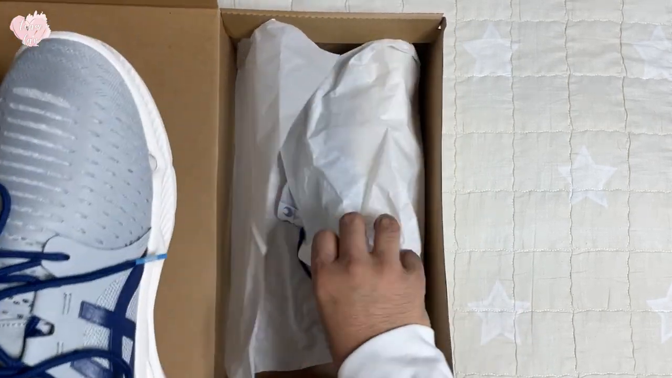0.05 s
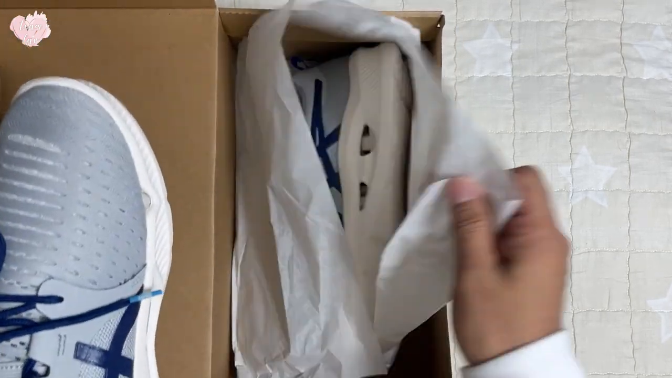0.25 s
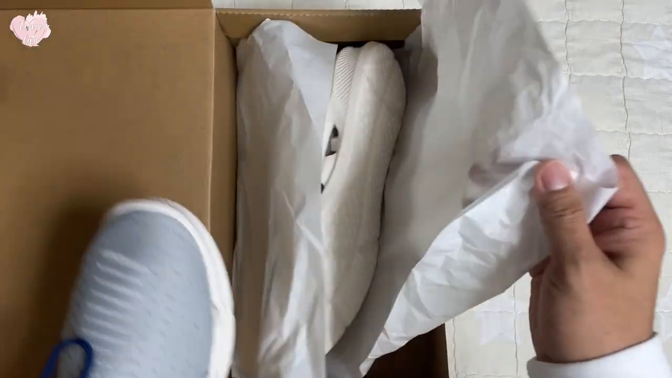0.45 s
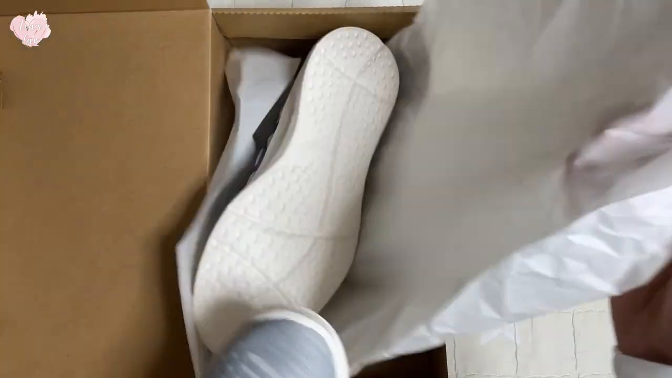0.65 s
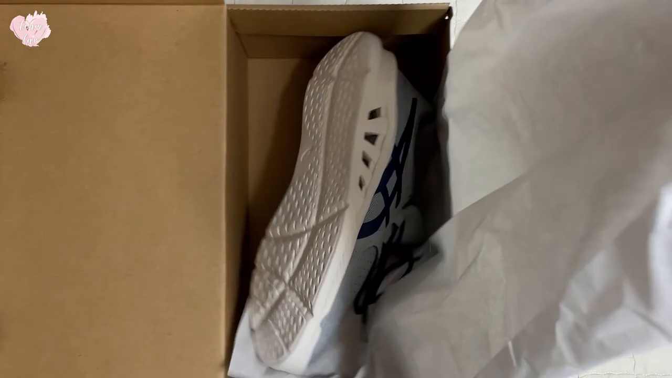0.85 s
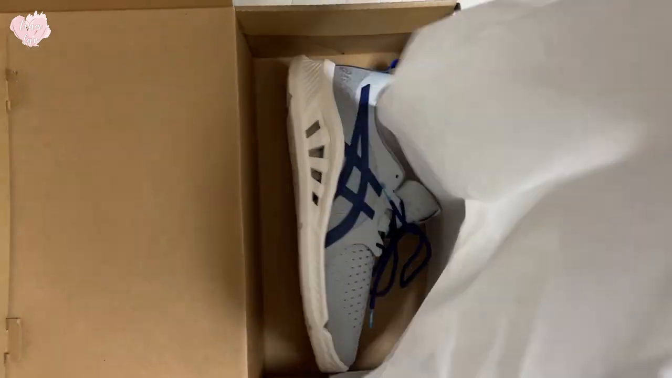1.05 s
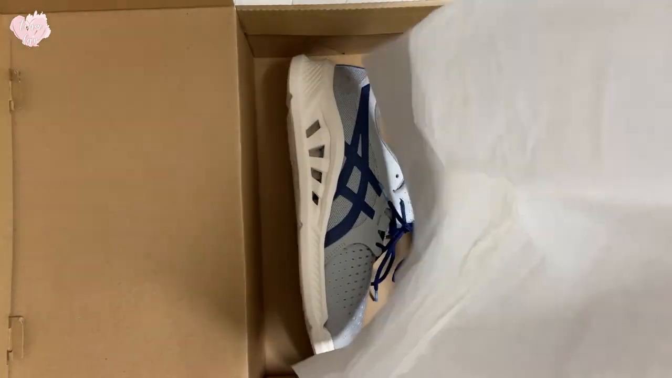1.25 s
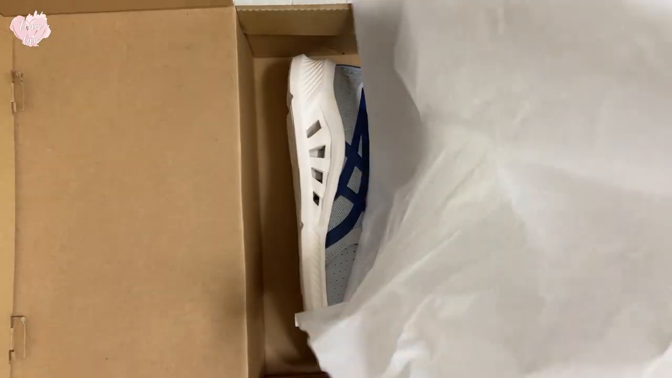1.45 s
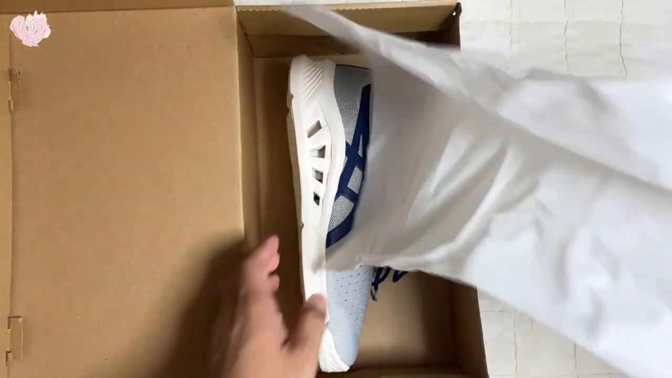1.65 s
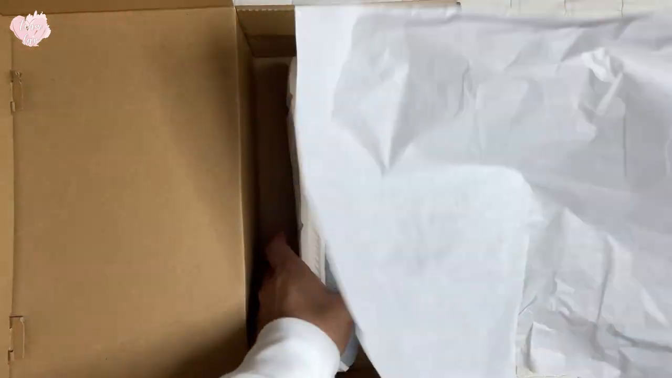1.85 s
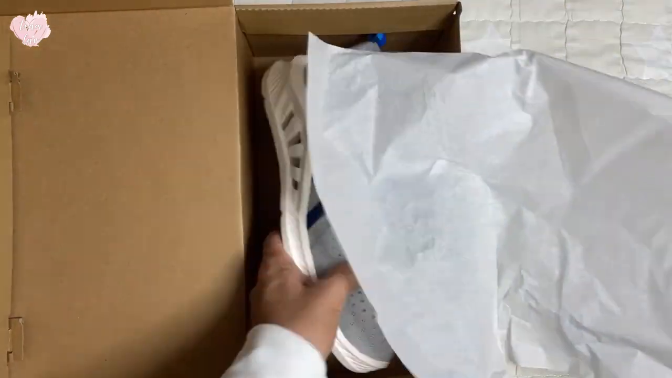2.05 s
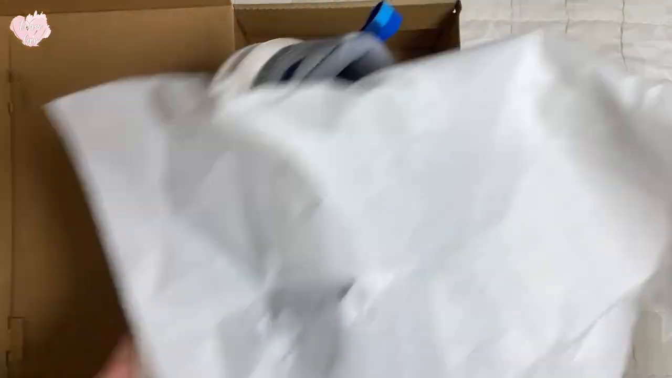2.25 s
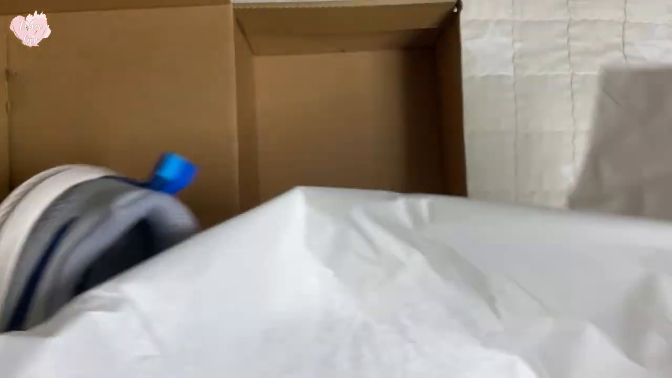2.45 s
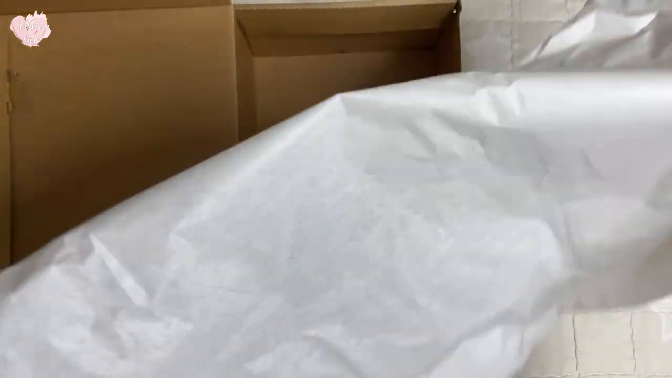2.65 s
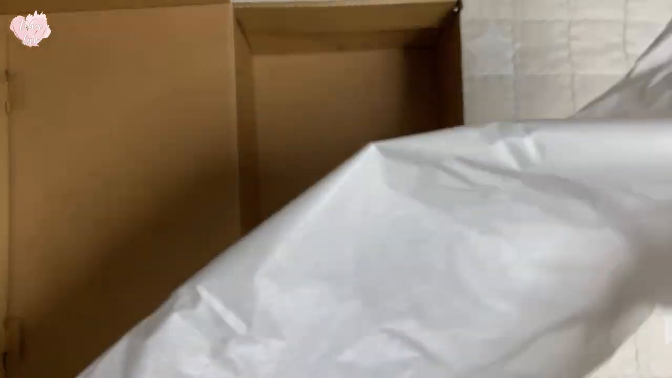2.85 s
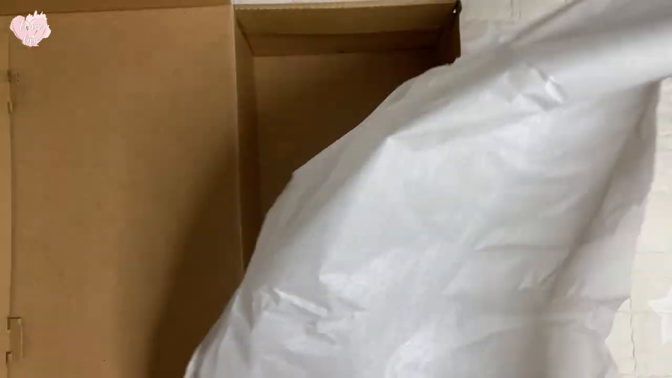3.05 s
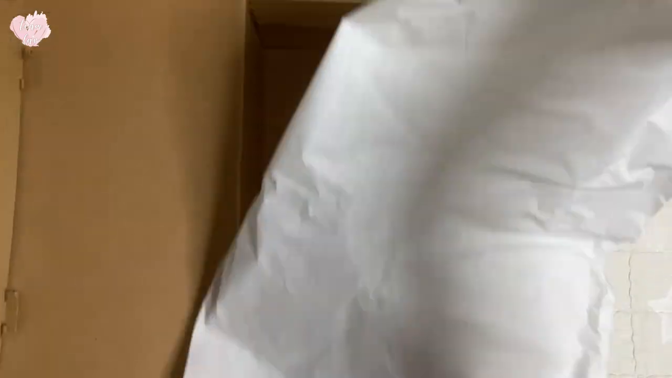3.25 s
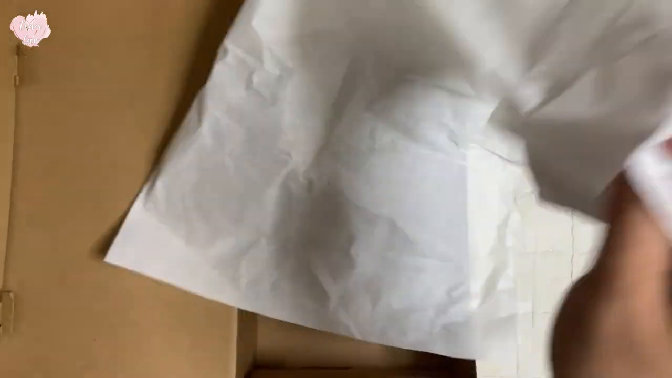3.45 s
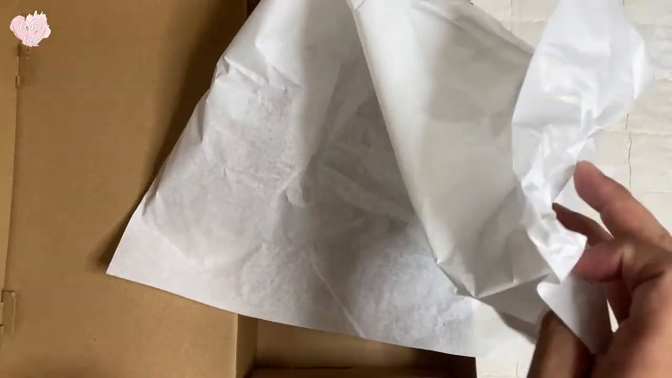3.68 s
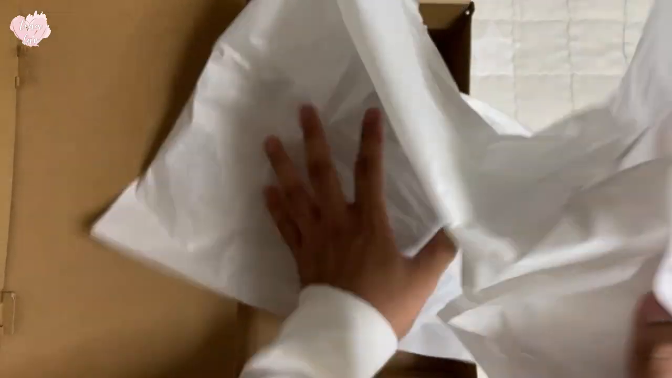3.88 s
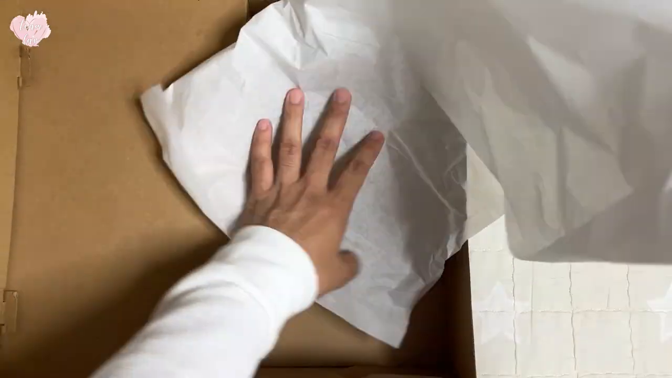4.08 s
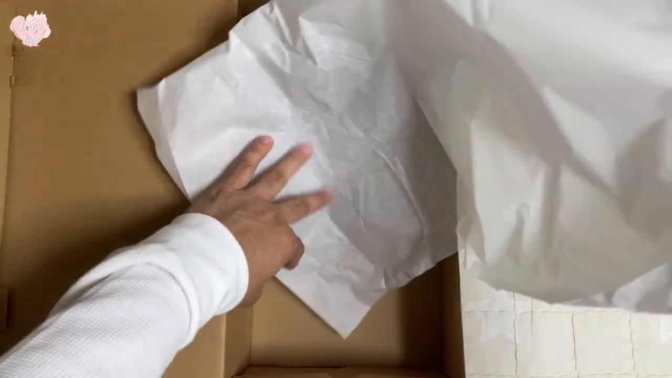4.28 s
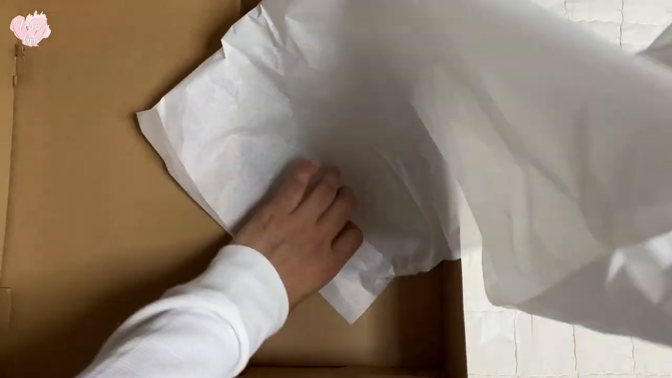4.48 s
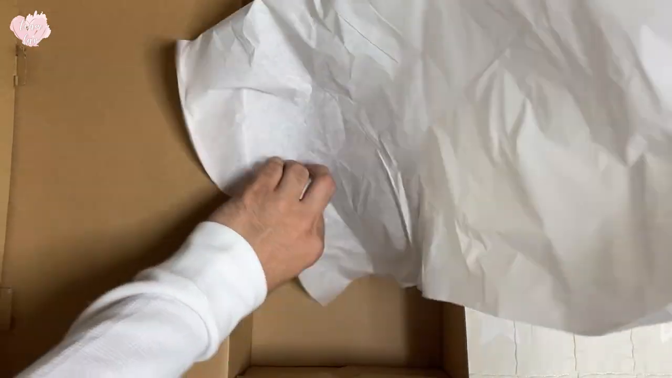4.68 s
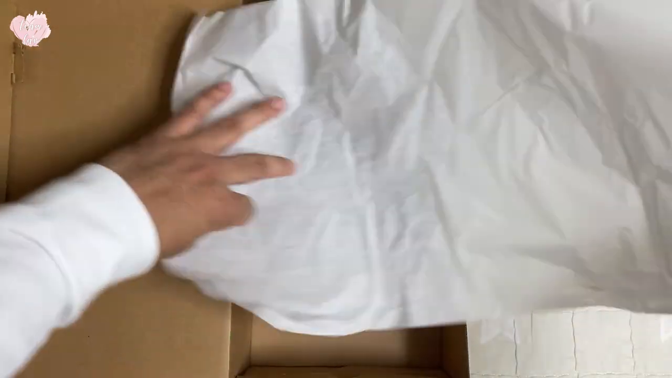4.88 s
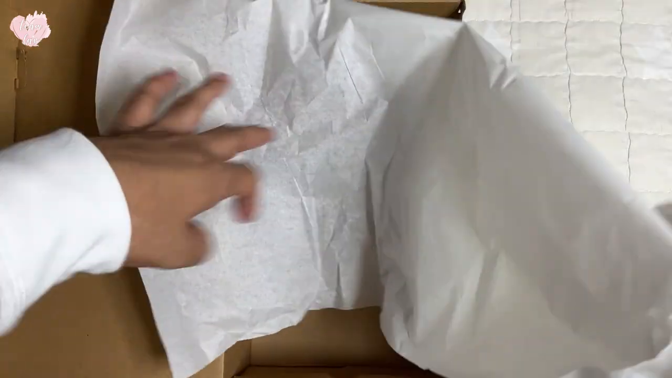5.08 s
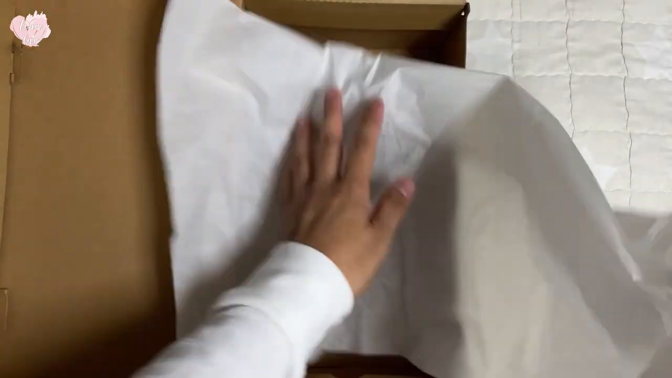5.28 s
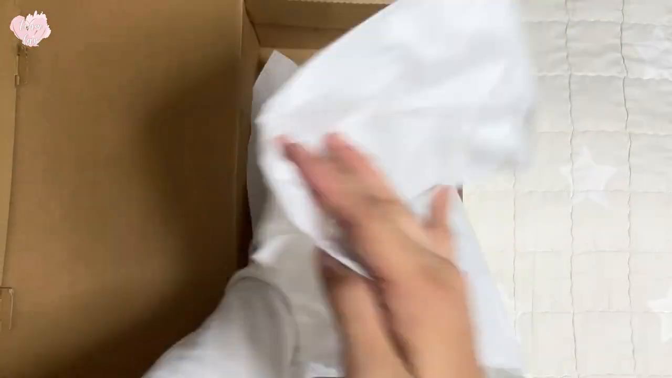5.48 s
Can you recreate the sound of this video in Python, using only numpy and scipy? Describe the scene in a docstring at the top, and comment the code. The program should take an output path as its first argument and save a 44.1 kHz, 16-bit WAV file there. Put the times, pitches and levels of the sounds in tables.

```python
"""Tissue paper crackles and rustles as hands pull it from a shoe and unfold it in a cardboard shoebox, close by.
Tiny creases buckle in clumps under each pull, larger ones snap singly: bursts of noise that die within milliseconds.
Panels of the sheet pop as falling chirps, and the sheet fans low puffs of noise.
Shoe and hands bump the box as damped low tones; its walls scatter the paper sound, and a quiet room hums faintly."""
import sys
import numpy as np
from scipy import signal
from scipy.fft import rfft, irfft, next_fast_len
from scipy.io import wavfile
from scipy.ndimage import uniform_filter1d

SR = 44100
rng = np.random.default_rng(int(sys.argv[2]) if len(sys.argv) > 2 else 0)


def bounce(signal):
    """Save signal as a 16-bit WAV file at the path given by the first command-line argument."""
    frames = np.transpose(np.atleast_2d(signal))
    limited = np.clip(frames, -1, 1)
    pcm = np.round(limited * 32767).astype(np.int16)
    wavfile.write(sys.argv[1], SR, pcm)


N = 243627
TIME = np.arange(N) / SR
SIZE = next_fast_len(N + 8192)  # transform length, padded
FREQ = np.maximum(np.arange(SIZE // 2 + 1) * SR / SIZE, 1)


def from_db(db):
    """Decibels to gain."""
    return 10 ** (np.asarray(db) / 20)


def rms_one(x):
    """Scale to rms 1."""
    return x / np.sqrt(np.mean(x ** 2) + 1e-20)


def gains(points):
    """Turn rows of Hz and dB into a gain at every frequency, joined along log frequency."""
    hz, db = np.transpose(points)
    return from_db(np.interp(np.log(FREQ), np.log(hz), db))


def filtered(x, response):
    """Apply a frequency response."""
    return irfft(rfft(x, SIZE) * response, SIZE)[..., :N]


def below(hz):
    """The low half of a crossover; the high half is one minus this."""
    return 1 / (1 + (FREQ / hz) ** 4)


def drift(rate):
    """Smooth random wander of rms 1, heading for a new value rate times a second."""
    knots = rng.standard_normal(4096)
    return rms_one(np.interp(TIME * rate, np.arange(len(knots)), knots))


def dying(energy, decay_s):
    """Spread each packet of energy over an exponential decay."""
    r = np.exp(-1 / (decay_s * SR))
    return signal.lfilter([1 - r], [1, -r], energy + 1e-20)


def swell_and_fade(age):
    """A pulse that rises to 1 at age 1, then dies away."""
    return age * np.exp(1 - age)


def pulling():
    """Each pull swells, holds and dies away, a little jerkily; returns rustle level and low-mid body in dB."""
    # Pulls and presses of the hands on the sheet. Each row: time of reaching full strength in seconds,
    # rustle in dB before the mix trim, attack in seconds, hold in seconds,
    # low-mid body of slack panels in dB before its trim.
    pulls = [(0.026, -27.5, 0.18, 0.037, -1), (0.178, -25, 0.05, 0.031, -2),
             (0.31, -30.5, 0.031, 0.038, -3), (0.387, -33, 0.0027, 0.09, -2),
             (0.507, -30, .002, 0.0092, 3.5), (0.576, -32, 0.017, 0.017, 3),
             (0.654, -24.5, 0.027, 0.045, 0), (0.786, -24, 0.077, 0.14, -1),
             (1.036, -25.5, 0.08, 0.018, -1.5), (1.169, -38, 0.025, 0.031, -4),
             (1.391, -41.5, 0.012, 0.1, -3.5), (1.605, -33.5, 0.06, 0.0033, -2.5),
             (1.66, -40, 0.03, 0.032, -8), (1.715, -35, 0.003, 0.007, -12),
             (1.793, -32.5, 0.0098, 0.0092, -4), (1.881, -40.5, 0.045, 0.025, -1),
             (2.098, -26.5, 0.0024, 0.03, 1), (2.211, -30.5, 0.028, 0.034, -2.5),
             (2.374, -40.5, 0.02, 0.01, 1.5), (2.442, -40, 0.011, 0.07, 1.5),
             (2.555, -37, 0.002, 0.085, -0.5), (2.71, -45, 0.003, 0.0044, 5.5),
             (2.823, -41, 0.0075, 0.15, 1), (3.066, -45, 0.079, 0.016, -18),
             (3.183, -37.5, 0.012, 0.054, 2.5), (3.348, -40.5, 0.041, 0.049, 0.5),
             (3.498, -32, 0.019, 0.049, 2), (3.66, -40.5, 0.018, 0.016, -4), (3.855, -33, 0.006, 0.09, 0),
             (3.992, -27, 0.0035, 0.037, 3.5), (4.157, -26, 0.0045, 0.019, 1.5),
             (4.246, -25, 0.13, 0.012, -1.5), (4.321, -29.5, .01, 0.028, -2.5),
             (4.42, -37.5, 0.016, 0.0046, 2.5), (4.668, -30.5, 0.055, .002, -2),
             (4.724, -27.5, 0.0081, 0.025, 1), (4.888, -39.5, 0.002, 0.025, 0),
             (4.944, -27, 0.033, .002, 1.5), (4.993, -29, 0.012, 0.022, -1.5),
             (5.148, -43, 0.022, 0.0033, 0), (5.232, -43, 0.012, 0.063, -6),
             (5.321, -29.2, 0.003, 0.078, 0.5), (5.439, -25.8, 0.003, 0.043, -2.5)]
    release_s = 0.045  # the sheet settles after each pull
    rest_db, rest_body_db = -52, 4  # the sheet never lies quite still
    jerk_db, jerks_per_s = 1.0, 40  # the paper gives way unevenly
    energy = np.full(N, from_db(rest_db) ** 2)
    slack = energy * from_db(rest_body_db) ** 2
    for s, db, attack, hold, body_db in pulls:
        before = np.maximum(s - TIME, 0) / attack
        after = np.maximum(TIME - s - hold, 0) / release_s
        pull = from_db(db) ** 2 * np.exp(-2 * np.minimum(before + after, 20))
        energy = energy + pull
        slack = slack + pull * from_db(body_db) ** 2
    level = 10 * np.log10(energy) + jerk_db * np.tanh(drift(jerks_per_s))
    return level, 10 * np.log10(slack / energy)


def buckles(level, per_s, growth, size_db, clump_db):
    """Energy of tiny creases giving way in clumps, more of them under a harder pull; evened to a mean near 1."""
    born = rng.random(N) < per_s * from_db(growth * (level - np.mean(level))) / SR
    clumps = np.tanh(drift(170))
    sizes = np.minimum(rng.exponential(1, N), 2.6)
    energy = born * from_db(size_db * sizes + clump_db * clumps) ** 2
    local_mean = uniform_filter1d(uniform_filter1d(energy, size=1000), size=700)
    return energy / (local_mean + 0.00082)


def stray_snaps(level, count=200):
    """Lesser creases snap at random moments, louder under a harder pull, so that the pauses stay quiet."""
    per_s, follows = 24, 1.0  # mean rate; share of the pull's swing
    mean_db, spread_db, tilt_db, decay_s = -40, 2.3, 7.5, .0004
    when, chance = rng.random((count, 2)).T
    strength, tilt = np.clip(rng.standard_normal((count, 2)), -2, 2).T
    at = (when * (N - 1)).astype(int)
    db = mean_db + follows * (level[at] - np.mean(level)) + spread_db * strength
    rows = np.column_stack([at / SR, db, tilt_db * tilt, np.full(count, decay_s)])
    return rows[chance < per_s * N / SR / count]


def snaps(rows, treble, longer, own_db, size=1500):
    """Energy of snapping creases in one band: bright dry ticks or longer tears, each with its own colour."""
    out, t = np.zeros(N + size), np.arange(size) / SR
    colours = own_db * rng.uniform(-1.2, 1, size)
    for (s, db, tilt, decay), colour in zip(rows, colours):
        at = max(round(s * SR), 0)
        fall = np.exp(-t / (decay * longer))
        gain = from_db(db + tilt * (treble - 0.38) + colour)
        out[at:at + size] += gain ** 2 * fall / np.sum(fall)
    return out[:N]


def crinkle(level, body, rustle_db, body_db, bright_db, snap_db, snap_bass_db, rub, bass_rub, own_db,
            ring_s, ring_slope, snap_slope, box_s, box_db, snap_box_db):
    """Creases set countless close modes ringing, as noise with brief decays; returns common and differing sound."""
    # Large creases snapping. Each row: start in seconds, level in dB before the mix trim,
    # treble tilt in dB, energy decay in seconds at 5 kHz.
    large_creases = [(0.0173, -31, 0, 0.0004), (0.1173, -24, -1, 0.0014), (0.2043, -19, 7, 0.0023),
                     (0.2926, -29, 9, 0.0015), (0.3176, -27, 6, 0.0012), (0.3481, -30, 1, 0.00058),
                     (0.3891, -25, -3, 0.0012), (0.4051, -24, 7, 0.0018), (0.5094, -32, 2, 0.0006),
                     (0.5665, -28, -12, 0.0014), (0.5831, -28, 3, 0.00076), (0.595, -27, 2, 0.0008),
                     (0.6958, -19.5, 6, 0.0008), (0.8769, -23, -8, 0.0018), (0.912, -20, -7, 0.001),
                     (0.982, -24.5, 8, 0.0014), (1.0402, -20.5, 15, 0.0035), (1.1319, -34.5, -6, 0.0013),
                     (1.222, -30, 1, 0.0004), (1.2253, -33.5, -5, 0.0005), (1.3525, -37, -9, 0.0002),
                     (1.3685, -44, -8, 0.0006), (1.4434, -40, 12, 0.0004), (1.4547, -41, 12, 0.0005),
                     (1.5392, -37, 18, 0.0008), (1.602, -33, -1, 0.0009), (1.6105, -33, 6, 0.0015),
                     (1.709, -28.5, 7, 0.0015), (1.7245, -37, 8, 0.0011), (1.9209, -29, -1, 0.00081),
                     (1.957, -36, -9, 0.0015), (1.9893, -35.5, -8, 0.0013), (2.093, -18.5, 2, 0.00091),
                     (2.115, -25, 3, 0.00096), (2.2095, -21, 10, 0.00082), (2.224, -23.5, -3, 0.0012),
                     (2.2387, -21, -4, 0.002), (2.2667, -25.5, 12, 0.001), (2.2715, -23.5, 4, 0.0011),
                     (2.3025, -32.5, 2, 0.0005), (2.3787, -32.5, 1, 0.00092), (2.4611, -33, 5, 0.00047),
                     (2.554, -31, -6, 0.0015), (2.5687, -36, -6, 0.00018), (2.5823, -29, 8, 0.00083),
                     (2.615, -27, 6, 0.0018), (2.6237, -28, 7, 0.00024), (2.6719, -33.5, 9, 0.00044),
                     (2.7186, -34.5, 0, 0.00077), (2.7321, -30, 4, 0.0025), (2.7646, -42, 12, 0.0005),
                     (2.808, -51, 0, 0.0006), (2.8582, -36.5, 2, 0.00025), (2.8958, -29.5, -4, 0.0018),
                     (2.9546, -27.5, 4, 0.0006), (3.0268, -36.5, -3, 0.0012), (3.083, -37, -8, 0.0007),
                     (3.0994, -37, -8, 0.00056), (3.1411, -35.5, 8, 0.00027), (3.1578, -30, 4, 0.00024),
                     (3.173, -43, 8, 0.0007), (3.2061, -29, 13.5, 0.00028), (3.2128, -26, 6, 0.00038),
                     (3.2325, -31, 0, 0.001), (3.2888, -32.5, 13, 0.00017), (3.3802, -35, -2, 0.00052),
                     (3.4123, -34.5, -18, 0.00049), (3.49, -36, -9, 0.0015), (3.527, -25.5, -6, 0.0022),
                     (3.5422, -26.5, -11, 0.00076), (3.549, -30, 9, 0.0008), (3.6176, -34.5, 9, 0.00064),
                     (3.7001, -32, 6, 0.001), (3.7083, -29, 1, 0.001), (3.819, -36.5, -4, 0.00081),
                     (3.84, -30.5, -1, 0.0012), (3.861, -24.5, 0, 0.0016), (3.907, -19.5, 0.5, 0.0023),
                     (3.9344, -34, 15, 0.00025), (3.989, -24, -6, 0.00077), (4.111, -26.5, 5, 0.00052),
                     (4.248, -16.5, 5, 0.0004), (4.3094, -23, -11, 0.0012), (4.3971, -28.5, -2, 0.0008),
                     (4.4547, -49, -4, 0.0005), (4.4737, -36.5, -7, 0.0013), (4.556, -28.5, -3, 0.00093),
                     (4.5646, -33.5, -1, 0.00054), (4.6065, -32, 3, 0.0026), (4.6619, -28, 6, 0.0003),
                     (4.6759, -26.5, -11, 0.00067), (4.7229, -25, 12, 0.0013), (4.729, -22, 9, 0.0013),
                     (4.8265, -27.5, 0, 0.00091), (4.8662, -30.5, -9, 0.00044), (4.8749, -34, 4, 0.0006),
                     (4.8915, -33, -7, 0.0006), (4.9504, -22.5, -3, 0.0015), (4.9547, -20, 4, 0.0017),
                     (5.057, -35, 4, 0.0013), (5.1036, -36.5, 7, 0.0009), (5.142, -38, 8, 0.00073),
                     (5.1498, -31, 7, 0.001), (5.156, -36.5, -9, 0.0011), (5.3167, -34, -5, 0.00087),
                     (5.3228, -19, -5, 0.0017), (5.3296, -24, 2, 0.00089), (5.3842, -23, 4, 0.0006),
                     (5.4352, -23.5, 8, 0.00073), (5.4485, -26, 2, 0.0002)]
    # A harder, louder pull rustles brighter. Each row: rustle level in dB, treble in dB before its trim.
    brightness = [(-46.5, -7), (-51, -6.5), (-22.5, 0.5)]
    # Colour of the paper. Each row: frequency in Hz, density in dB per Hz.
    paper_colour = [(60, -14.5), (170, -3.5), (380, 0.2), (600, -2), (900, -1.1), (1400, -3.5),
                    (2200, -0.2), (4400, -3.5), (5100, -2), (8000, -3.5), (10500, -7), (13000, -11),
                    (15600, -7.5)]
    bands_hz = np.geomspace(220, 14000, 10)
    bright = np.interp(level, *np.transpose(brightness))
    snapping = np.vstack([large_creases, stray_snaps(level)])
    creases = buckles(level, per_s=850, growth=0.51, size_db=0.5, clump_db=3.8)
    out = 0
    for hz, only in zip(bands_hz, np.eye(len(bands_hz))):
        bass = np.interp(hz, [700, 1700], [1, 0])
        treble = np.interp(hz, [4000, 10000], [0, 1])
        gain = from_db(level + rustle_db + bass * (body + body_db) + treble * (bright + bright_db))
        # the colour of the creases varies from moment to moment
        colour = rms_one(from_db(own_db * np.tanh(drift(500)))) ** 2
        # even hiss of paper sliding under a hard pull
        sliding = np.clip(rub * from_db(.5 * (level - np.max(level))) + bass * bass_rub, 0, 1)
        rustle = (1 - sliding) * creases * colour + sliding
        ring = ring_s * (3000 / hz) ** ring_slope  # high modes die first
        direct = dying(gain ** 2 * rustle, ring)
        cracks = snaps(snapping, treble, (5000 / hz) ** snap_slope, own_db=1.0)
        cracks = from_db(snap_db + bass * snap_bass_db) ** 2 * cracks
        # reflections inside the box
        walls = dying(from_db(box_db) ** 2 * direct + from_db(snap_box_db) ** 2 * cracks, box_s)
        noise = np.sqrt(direct + cracks + walls) * rng.choice([-1, 1], (2, N))
        band = np.sqrt(np.interp(np.log(FREQ), np.log(bands_hz), only))
        out = out + filtered(noise, band * gains(paper_colour))
    return out


def moving_echoes(x, strength_db, delay_s, travel, count=3):
    """Near cardboard mirrors the sheet; as the sheet moves, the ripple this leaves in its colour shifts."""
    gain, out = from_db(strength_db), x
    for k in range(count):
        delay = delay_s * (k + 1) * np.exp(travel * drift(9))
        source = np.maximum(np.arange(N) - np.round(delay * SR).astype(int), 0)
        out = out + (-1) ** k * gain * x[:, source]
    return out / np.sqrt(1 + count * gain ** 2)


def room_tail(x, level_db, decay_s, size=14000):
    """A faint tail from the room: decaying noise, different in its two parts."""
    tail = rng.standard_normal((2, size)) * np.exp(-np.arange(size) / (decay_s * SR))
    tail = tail / np.sqrt(np.sum(tail ** 2, axis=1, keepdims=True))
    return from_db(level_db) * signal.oaconvolve(x[None], tail, axes=1)[:, :N]


def room_tone():
    """Dull room noise and a slightly wavering hum."""
    # The quiet room. Each row: frequency in Hz, density in dB per Hz.
    room_colour = [(25, -21), (60, -1), (80, 1), (105, 7), (140, 2), (200, 0), (400, -5), (1000, -39),
                   (4000, -21), (15000, -31)]
    room_db, hum_hz, hum_db = -55, 140.9, -52
    phase = 2 * np.pi * hum_hz * TIME + 0.35 * drift(6.6)
    hum = np.sqrt(2) * np.sin(phase) * from_db(hum_db + 1.1 * drift(3.5))
    noise = rms_one(filtered(rng.standard_normal(N), gains(room_colour)))
    return hum + from_db(room_db) * noise


def air(level, level_db, low_hz, high_hz):
    """The sheet stirs the air as it is pulled and fans soft, low puffs; the microphone loses the deepest part."""
    # Puffs of air fanned by the sheet. Each row: centre in seconds, peak in dB before the mix trim,
    # half length in seconds.
    fanned_puffs = [(0.6, -48, 0.03), (0.828, -28.5, 0.047), (0.94, -30, 0.017), (1.013, -24, 0.019),
                    (1.088, -33, 0.01), (1.168, -46, 0.027), (1.757, -34, 0.027), (2.125, -52, 0.039),
                    (2.64, -44, 0.019), (3.423, -39.5, 0.027), (3.543, -46, 0.029)]
    draught_db, follows = -55, 0.17  # air at a mean pull, before the trim; share of the pull's swing
    flow = from_db(draught_db + follows * (level - np.mean(level)))
    for s, db, half in fanned_puffs:
        flow = flow + from_db(db) * np.exp(-np.minimum(((TIME - s) / half) ** 2, 20))
    rumble = filtered(rng.standard_normal(N), below(high_hz) * (1 - below(low_hz)))
    swell = np.sqrt(uniform_filter1d(rumble ** 2, size=1800))  # divided out, so the flow sets the level
    return filtered(from_db(level_db) * flow * rumble / swell, (1 - below(low_hz)) ** 2)


def pops(level_db, rough, lowest_hz, size=3000):
    """Bending waves travel faster when short, so each pop is a quick falling chirp."""
    # Whole panels of the sheet flipping over. Each row: start in seconds, peak in dB before the mix trim,
    # starting pitch in Hz, rise time in seconds.
    flips = [(0.08, -18, 940, 0.0013), (0.205, -15, 1460, 0.001), (0.913, -16, 1270, 0.003),
             (0.9584, -14, 1780, 0.0024), (0.9637, -8, 715, 0.0028), (0.9820, -2, 1890, 0.00141),
             (0.991, -8, 980, 0.0014), (1.002, -11.5, 1030, 0.0012), (1.012, -14, 800, 0.0013),
             (1.065, -11, 1460, 0.0014), (2.858, -28, 1060, 0.0021), (3.196, -31, 1480, 0.0035),
             (3.231, -29.5, 1090, 0.0022), (3.3, -30.5, 900, 0.0016), (3.716, -30, 696, 0.0014),
             (3.936, -26, 1320, 0.0028), (4.003, -25, 1920, 0.0021), (4.427, -35, 1110, 0.0015),
             (4.948, -23, 1500, 0.002), (5.324, -24, 1490, 0.0021), (5.4388, -15.5, 1490, 0.0012)]
    out, t = np.zeros(N + size), np.arange(size) / SR
    for s, db, hz, rise in flips:
        age, at = t / rise, round(s * SR)
        chirp = np.sin(2 * np.pi * hz * rise * np.log1p(age))
        wrinkles = rms_one(uniform_filter1d(rng.standard_normal(size), size=26))
        out[at:at + size] += from_db(db + level_db) * swell_and_fade(age) * (chirp + rough * wrinkles)
    return signal.sosfilt(signal.butter(2, lowest_hz, "high", fs=SR, output="sos"), out[:N])


def bumps(level_db, rough, size=6000):
    """A soft contact sets a heavily damped cardboard panel swinging briefly, with a little scuffing."""
    # Shoe and hands bumping softly on the cardboard. Each row: start in seconds,
    # peak in dB before the mix trim, pitch in Hz, rise time in seconds.
    contacts = [(0.211, -38, 256, 0.0062), (0.785, -29, 290, 0.0034), (0.813, -23, 374, 0.0039),
                (0.824, -22.5, 240, 0.0037), (0.838, -19.5, 338, 0.0072), (0.857, -20.5, 245, .004),
                (0.922, -21, 130, 0.0043), (0.997, -19, 70.4, 0.007), (1.017, -19, 55, 0.0046),
                (1.051, -25.5, 196, 0.0046), (1.72, -34, 218, 0.0092), (1.725, -31, 116, 0.0042),
                (1.745, -30, 62, 0.01), (2.866, -44, 258, 0.0036), (2.925, -35, 242, 0.0049),
                (2.983, -40, 250, 0.0029), (3.188, -33, 576, 0.0048), (3.352, -33.5, 490, 0.0021),
                (3.408, -40, 72, .009), (4.015, -34, 343, 0.005), (4.044, -28, 147, 0.011),
                (4.183, -24, 203, 0.0065), (4.246, -25, 140, 0.0018), (4.716, -44, 270, 0.0046)]
    out, t = np.zeros(N + size), np.arange(size) / SR
    for s, db, hz, rise in contacts:
        age, at = t / rise, round(s * SR)
        octave = signal.butter(2, [hz, 2 * hz], "band", fs=SR, output="sos")
        scuff = rms_one(signal.sosfilt(octave, rng.standard_normal(size)))
        panel = np.sin(2 * np.pi * hz * t)
        out[at:at + size] += from_db(db + level_db) * swell_and_fade(age) * (panel + rough * scuff)
    return out[:N]


def scene():
    """The paper and its reflections, air, bumps and room reach two closely spaced microphone ports."""
    # The two ports. Each row: frequency in Hz, phase in radians by which the left leads.
    port_phase = [(0, 0), (2000, 0), (2600, .8), (4500, .7), (4900, -.1), (5400, .2), (7300, 3.0),
                  (8100, 3.25), (10500, 6.2), (11600, 6.35), (13800, 9.3), (14700, 9.5), (15700, 10.5)]
    # Share of the sound that differs between the ports. Each row: frequency in Hz, gain in dB.
    spread = [(100, -23), (400, -13), (1100, -10), (1800, -20.5), (2900, -6), (4500, -8.5), (5300, -7.5),
              (6800, -17), (7700, -24.5), (9300, -2.5), (11000, -30), (12600, -3), (14200, -17),
              (15700, -13)]
    level, body = pulling()
    paper = crinkle(level, body, rustle_db=5.0, body_db=0.5, bright_db=0.5, snap_db=25.5, snap_bass_db=-3.0,
                    rub=0.31, bass_rub=0.024, own_db=4.0, ring_s=0.001, ring_slope=0.39, snap_slope=0.18,
                    box_s=0.0051, box_db=-6.5, snap_box_db=-9.5)
    paper = moving_echoes(paper, strength_db=-14.5, delay_s=.0013, travel=.4)
    to_right = np.array([[1], [-.8]])  # the billowing part hangs to the right
    paper = paper + pops(level_db=-5.5, rough=0.42, lowest_hz=158) * to_right
    common, apart = paper + room_tail(paper[0], level_db=-12.0, decay_s=0.026)
    common = common + room_tone() + air(level, level_db=2.5, low_hz=40.0, high_hz=60.3)
    common = common + bumps(level_db=-5, rough=0.31)
    sides = np.array([[1], [-1]])  # left, right
    both = common + sides * filtered(apart, gains(spread))
    lead = np.interp(FREQ, *np.transpose(port_phase))
    return filtered(both, np.exp(.5j * sides * lead)) * from_db(-.15 * sides)  # the right a touch louder


def record(dry):
    """The top is cut steeply above 15850 Hz."""
    return filtered(dry, 1 / np.sqrt(1 + (FREQ / 15850) ** 240))


dry = scene()
out = record(dry)
bounce(out)
```